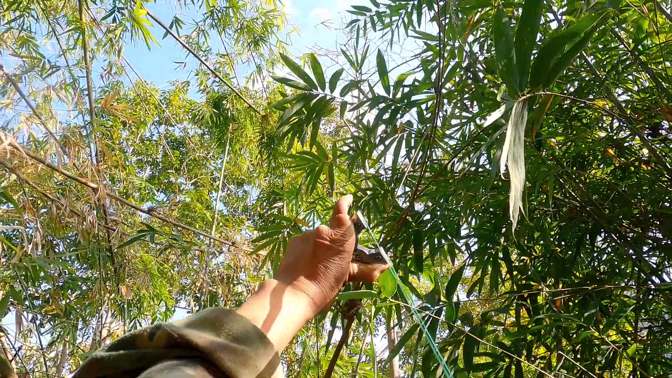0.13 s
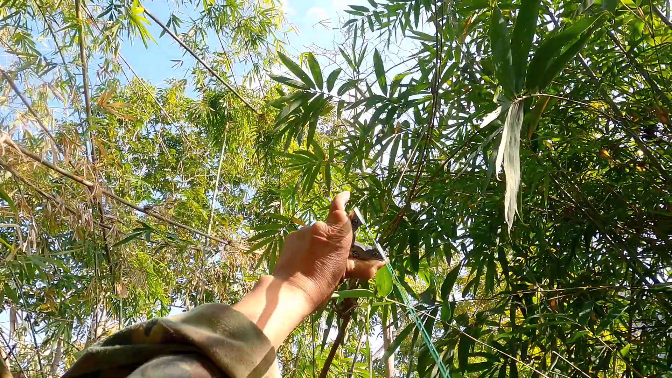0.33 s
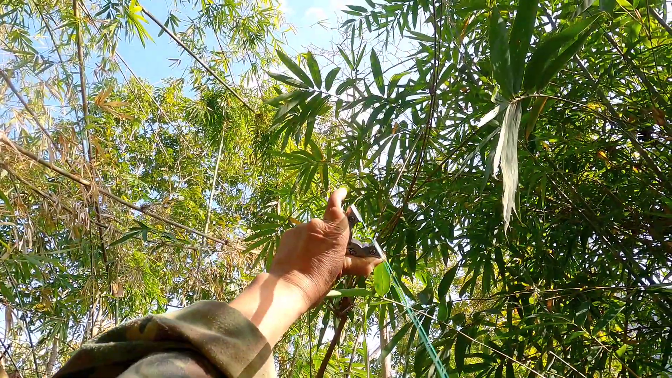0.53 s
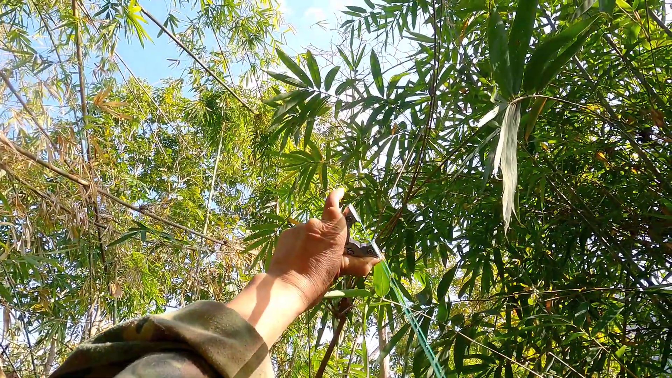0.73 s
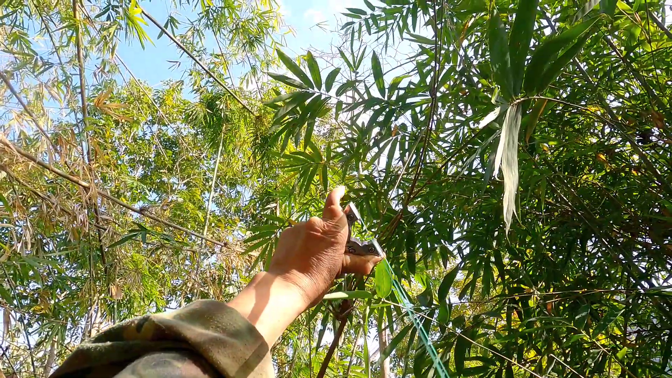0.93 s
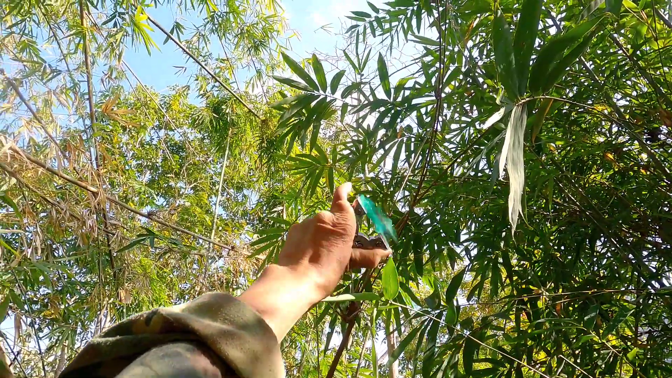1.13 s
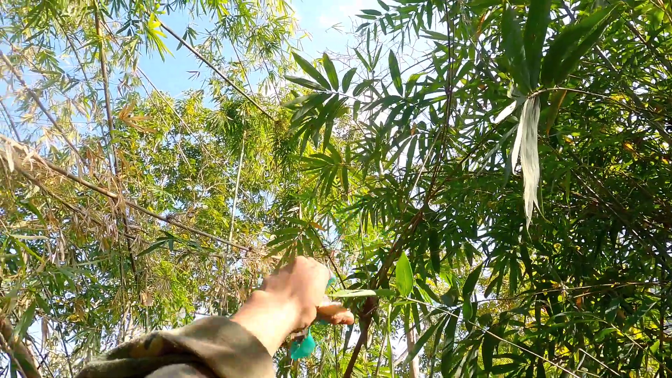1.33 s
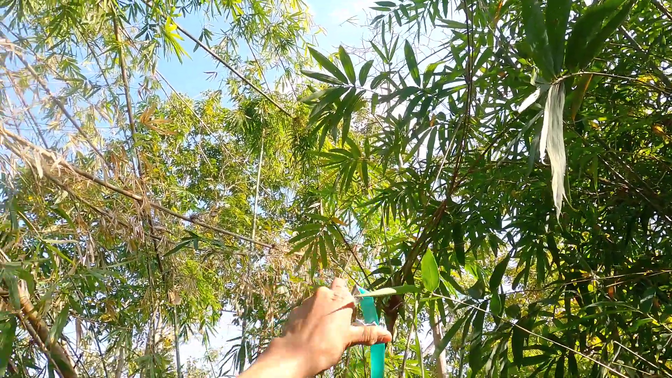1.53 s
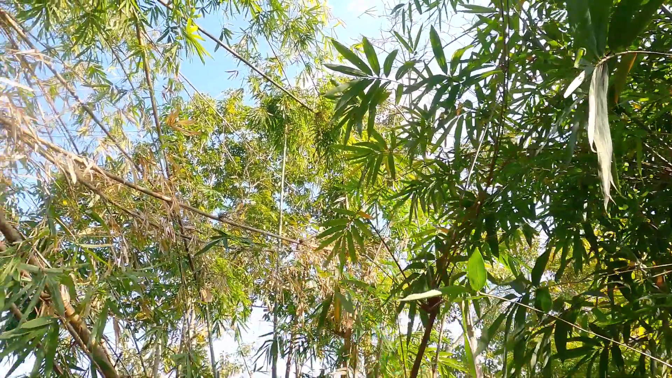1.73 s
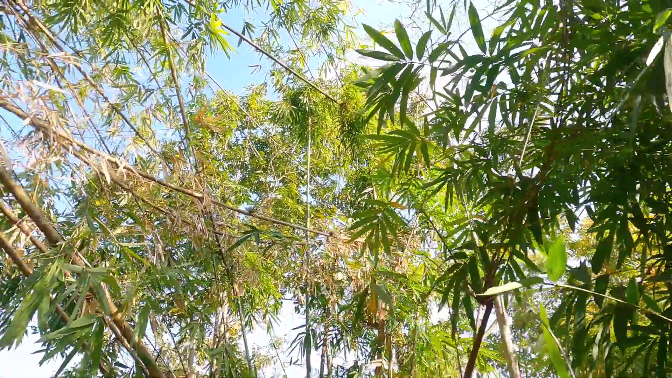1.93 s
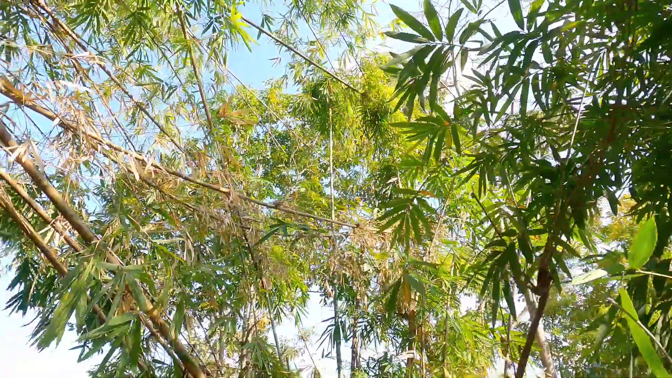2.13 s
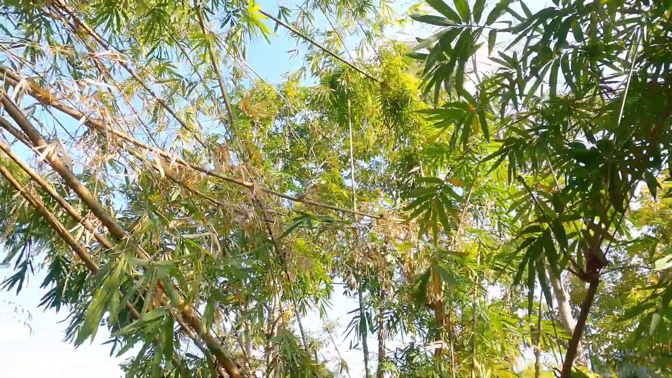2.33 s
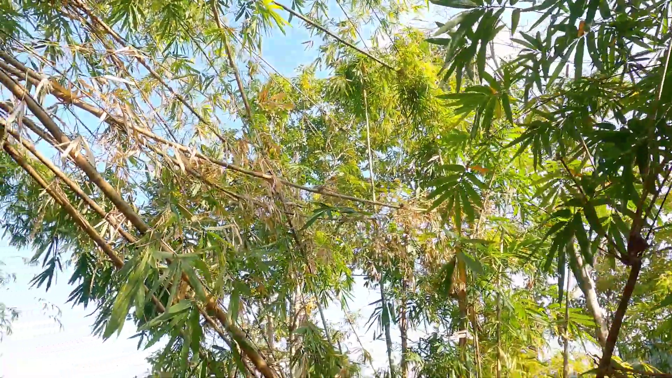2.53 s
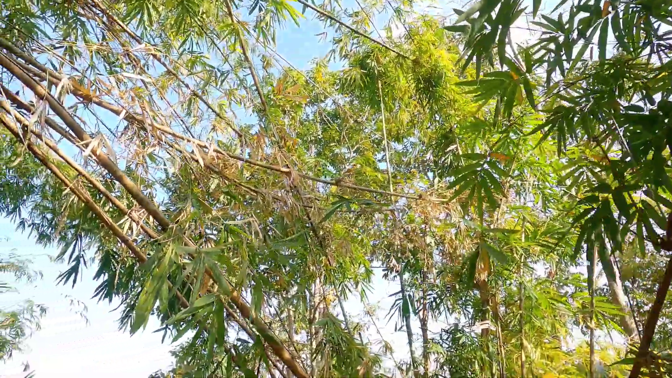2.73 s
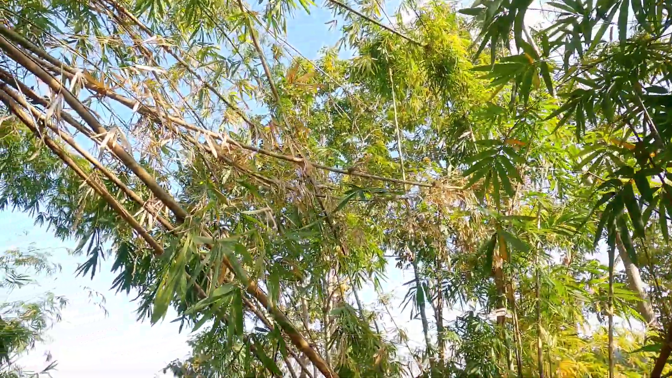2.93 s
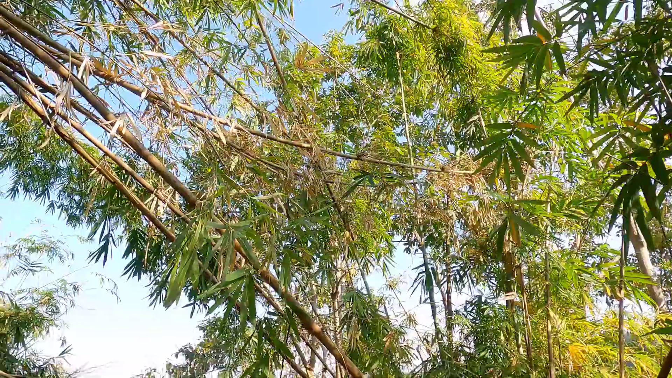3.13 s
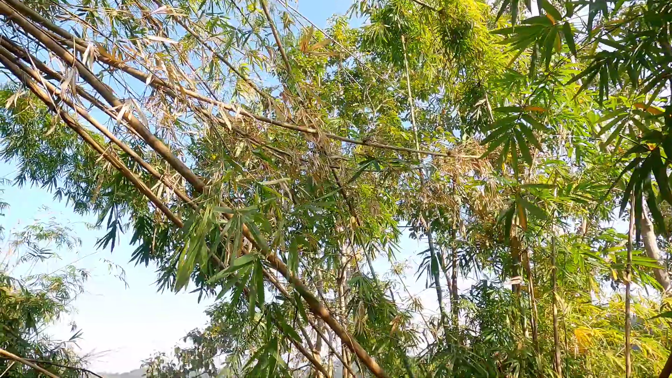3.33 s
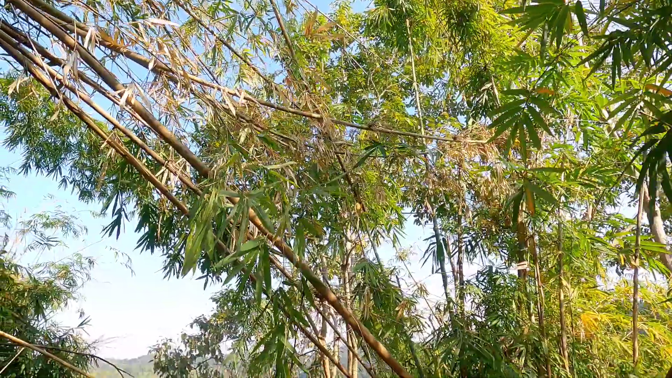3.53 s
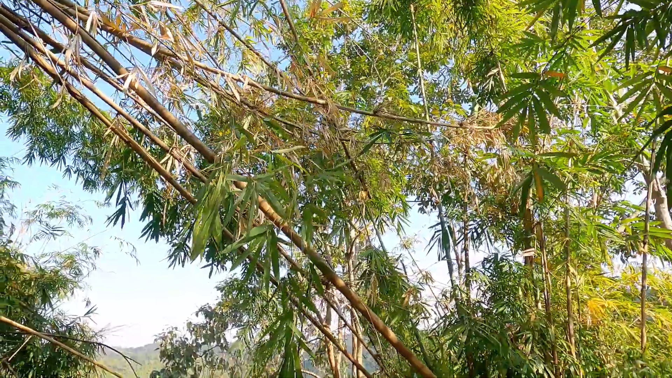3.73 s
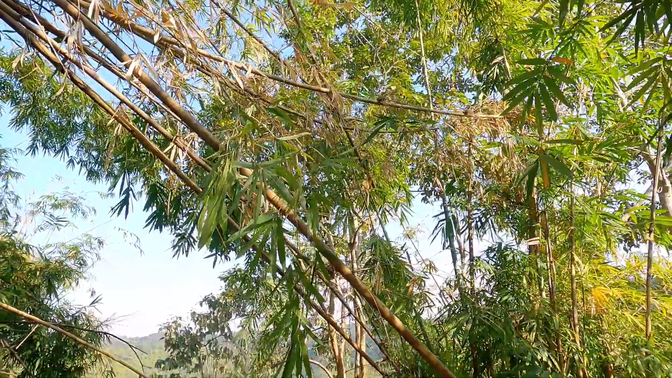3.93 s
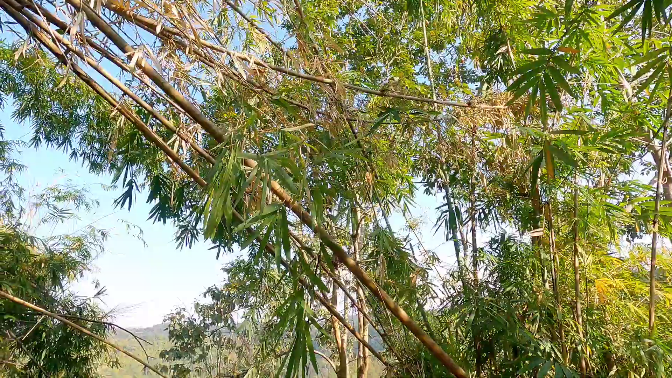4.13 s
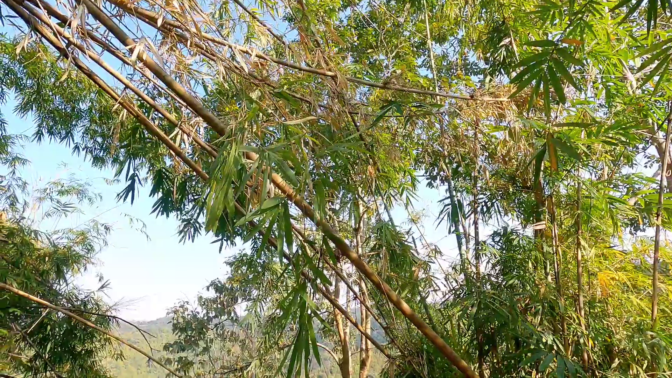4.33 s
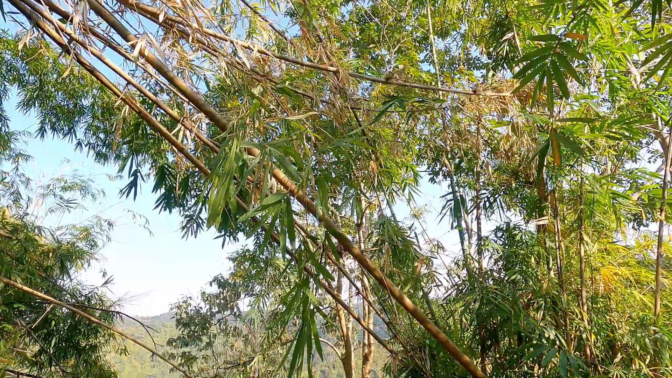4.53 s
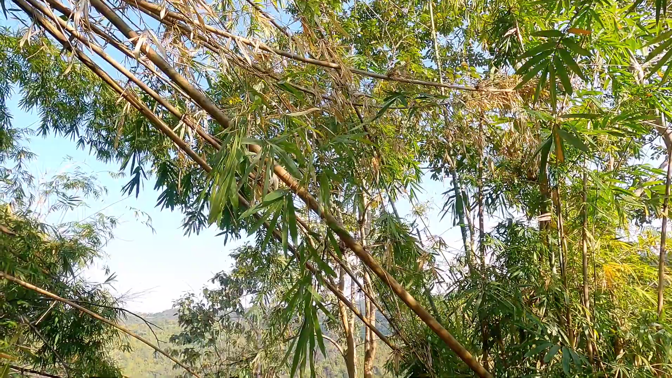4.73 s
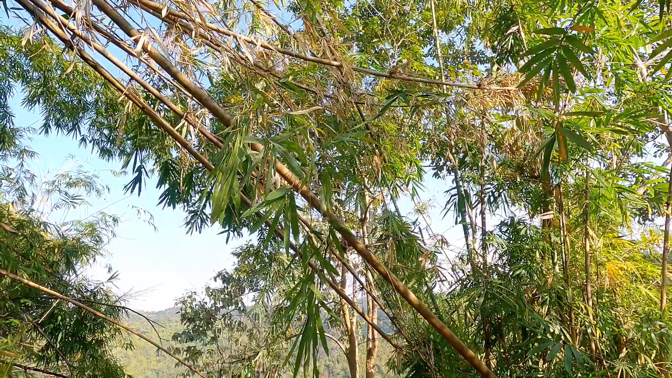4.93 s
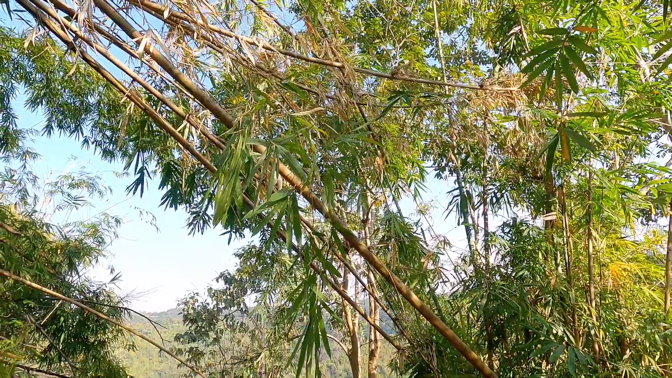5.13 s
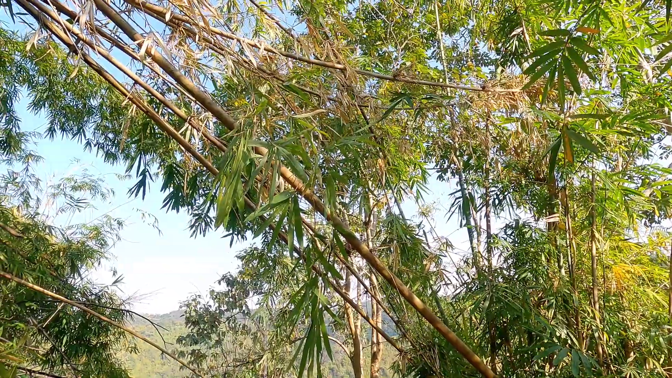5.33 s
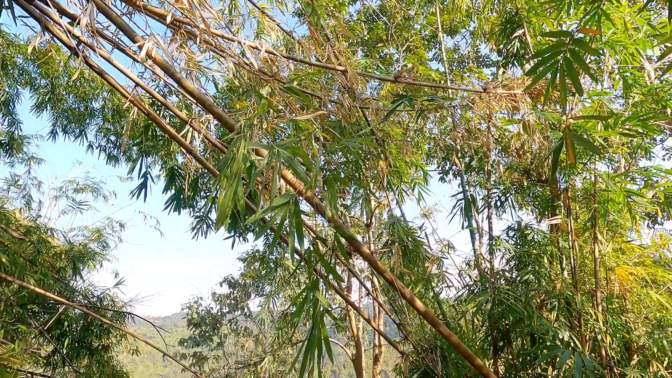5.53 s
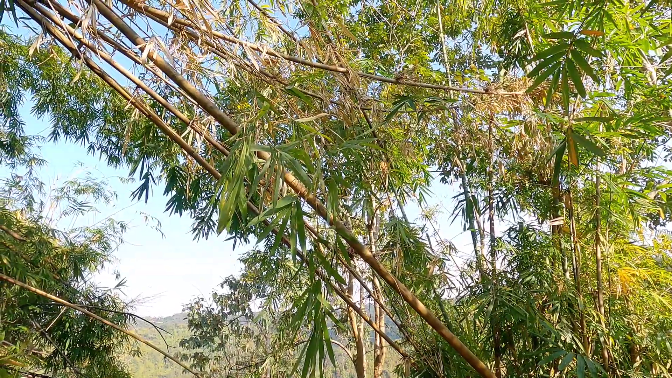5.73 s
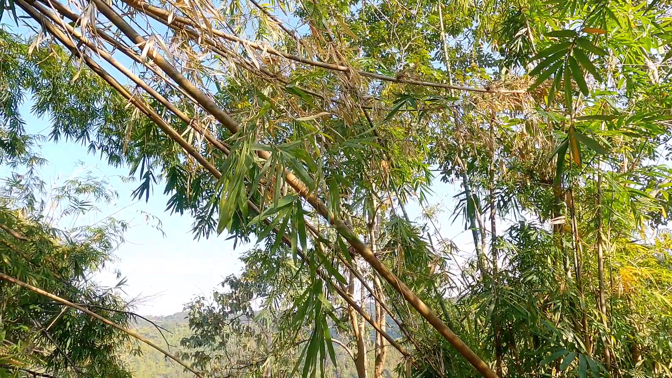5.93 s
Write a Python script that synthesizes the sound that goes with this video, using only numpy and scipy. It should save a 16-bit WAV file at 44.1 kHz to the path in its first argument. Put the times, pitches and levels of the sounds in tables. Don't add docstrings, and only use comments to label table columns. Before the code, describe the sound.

Quiet bamboo grove, faint leaf hiss and low distant hum, a few weak bird notes and a sleeve swish. At just over one second a slingshot releases: whip, very loud snap, fluttering rubber, then a hard pellet crack on a stem. Wind thumps the microphone, leaves shake, and small birds chirp rapidly, thinning toward the end, with sharp twig ticks.

```python
import sys
import numpy as np
from scipy import signal
from scipy.fft import rfft, irfft, next_fast_len
from scipy.io import wavfile
from scipy.ndimage import uniform_filter1d, map_coordinates

SR = 44100
rng = np.random.default_rng(int(sys.argv[2]) if len(sys.argv) > 2 else 0)


def pcm_store(signal):
    levels = np.round(np.clip(np.atleast_2d(signal), -1, 1) * 32767)
    wavfile.write(sys.argv[1], SR, levels.astype(np.int16).T)


def level_to_linear(level):
    exponent = np.asarray(level, float) / 20
    return 10 ** exponent


N = 267951
T_S = np.arange(N) / SR
LET_GO_S, FORK_S, STRIKE_S = 1.166, 1.1888, 1.3814


def unit(x):
    return x / np.sqrt(np.mean(x ** 2) + 1e-20)


def along(points, hz):
    f, v = np.transpose(points)
    return np.interp(np.log(hz + 1), np.log(f + 1), v)


def wobble(rate_hz, count=N):
    knots = rng.standard_normal(int(count * rate_hz / SR) + 4)
    return map_coordinates(knots, [np.arange(count) * rate_hz / SR])


def swells(rows):
    return sum(level_to_linear(db - 20 * np.maximum((s - T_S) / rise_s, (T_S - s) / fall_s))
               for s, db, rise_s, fall_s in rows)


def filtered(x, response):
    m = next_fast_len(N + 8192)
    return irfft(rfft(x, m) * response(np.fft.rfftfreq(m, 1 / SR)), m)[..., :N]


def add(track, s, sound):
    part = track[..., round(s * SR):][..., :sound.shape[-1]]
    part += sound[..., :part.shape[-1]]


def panned(x, pan_db):
    return x * level_to_linear([[pan_db / 2], [-pan_db / 2]])


def rush(spectrum, alike, patchy_db):
    z = signal.stft(rng.standard_normal((2, N + 512)), nperseg=512)[2]
    field = uniform_filter1d(rng.standard_normal(z.shape[1:]), 6, 0)
    field = uniform_filter1d(field, 14, 1)
    pair = signal.istft(z * level_to_linear(patchy_db * unit(field)), nperseg=512)[1][:, :N]

    def response(hz):
        turn = np.arccos(np.clip(along(alike, hz), -1, 1)) / 2
        return level_to_linear(along(spectrum, hz)) * [np.cos(turn), np.sin(turn)]

    mid, side = filtered(pair, response)
    return unit(np.array([mid + side, mid - side]))


# f/Hz, t60/s
ECHO_T60 = [(200, 0.15), (600, 0.37), (3000, 0.42), (7000, 0.49), (12000, 0.24), (15000, .12)]


def grove(x, alike=.6, reach=1):
    hz, t, z = signal.stft(rng.standard_normal((2, SR)), SR, nperseg=128)
    decay = level_to_linear(-60 * t / along(ECHO_T60, hz)[:, None] / reach)
    mid, side = signal.istft(z * decay, SR, nperseg=128)[1]
    tail = np.array([mid + (1 - alike) * side, mid - (1 - alike) * side])
    tail /= np.linalg.norm(tail[0])
    return signal.fftconvolve(np.pad(x, (90, 0))[None], tail, axes=1)[:, :N]


def note(length_s, pitch, db, hoarse):
    u = np.linspace(0, 1, round(length_s * SR))
    path_hz = pitch(u)
    jitter = (.016 + .008 * hoarse * u ** 2) * wobble(190, count=len(u))
    turn = 2 * np.pi * np.cumsum(path_hz * (1 + jitter)) / SR
    steep = path_hz[-1] > 1.3 * path_hz[0]
    tone = np.sin(turn) + .2 * steep * (1 - u) ** 3 * np.sin(2 * turn)
    flutter = unit(level_to_linear((2.2 + hoarse * u ** 2) * wobble(110, count=len(u))))
    shape = np.sin(np.pi * u ** .65) ** 0.42
    return panned(level_to_linear(db + 4.5) * flutter * shape * tone, rng.normal(-1, 1.5))


# t/s, length/s, start f/Hz, end f/Hz, level/dB
CHIRP_CALLS = [(4.58, .058, 3245, 2720, -68), (3.892, .07, 3595, 2744, -67.5),
               (2.502, .014, 1950, 2250, -64), (2.695, 0.013, 2390, 1900, -66),
               (0.7, .047, 2605, 2750, -66), (1.807, 0.034, 1638, 2470, -59),
               (2.045, 0.034, 1920, 2370, -71.5), (2.315, 0.036, 1692, 2295, -70.5),
               (2.339, 0.038, 2180, 2690, -63), (2.457, 0.095, 1634, 2783, -61.5),
               (2.501, 0.044, 2013, 2590, -60), (2.563, 0.06, 2192, 2590, -65),
               (2.635, 0.067, 1997, 2814, -56), (2.643, 0.066, 1778, 2570, -56),
               (2.742, 0.072, 1668, 2799, -59), (2.765, 0.044, 1770, 2610, -59),
               (2.937, 0.055, 1996, 2970, -56.5), (2.987, 0.023, 1550, 2150, -61),
               (3.004, 0.038, 2250, 2620, -57), (2.597, 0.017, 2300, 2600, -63),
               (2.806, .022, 2000, 2500, -63.5), (3.222, 0.017, 2250, 2750, -65),
               (3.486, 0.0496, 3250, 3750, -71), (3.089, 0.031, 2070, 3170, -60.5),
               (3.13, 0.017, 2796, 2970, -74), (3.176, 0.061, 1620, 3005, -60.5),
               (3.232, 0.023, 2785, 2460, -65.5), (3.419, 0.042, 2094, 2683, -60.5),
               (3.767, 0.045, 1988, 3073, -62), (3.799, .024, 2150, 2800, -62),
               (4.076, 0.075, 3154, 3584, -66), (4.764, 0.076, 3397, 3817, -62.5)]
# t/s, length/s, start f/Hz, end f/Hz, level/dB
GLIDE_CALLS = [(0.599, .06, 3000, 3800, -77), (2.111, 0.036, 2750, 5180, -70),
               (4.555, .032, 4500, 3180, -71), (2.452, .014, 2690, 3400, -72.5),
               (2.488, 0.026, 5150, 5650, -74), (2.575, 0.015, 4400, 3700, -73),
               (2.627, .02, 3600, 4710, -71), (3.763, 0.011, 3400, 4286, -70),
               (2.526, 0.028, 1950, 2480, -62), (2.636, 0.014, 3250, 3780, -66),
               (2.916, 0.036, 2310, 5100, -69), (3.045, 0.017, 2560, 3030, -63.5),
               (3.035, .015, 1810, 2200, -66), (3.164, 0.024, 2510, 4190, -69),
               (3.43, 0.013, 2690, 3450, -66.5), (3.453, 0.01, 2803, 3700, -68),
               (3.457, .02, 2140, 2590, -65.5), (3.475, 0.01396, 2530, 3580, -65),
               (3.687, 0.02, 2190, 3330, -66.5), (3.713, 0.018, 2192, 3335, -74),
               (3.952, .015, 2270, 2900, -70), (5.475, 0.28, 3623, 2920, -68),
               (5.568, 0.075, 3700, 4340, -75.5)]
# t/s, length/s, f/Hz, level/dB
PIPE_CALLS = [
    (0.341, 0.043, 2577, -71),
    (0.763, .025, 4270, -76),
    (3.496, 0.033, 3880, -70),
    (3.54, .16, 3910, -78.5),
    (3.723, 0.07, 6048, -72.5),
    (4.149, .1, 3570, -77.5),
    (4.831, 0.057, 3890, -72),
    (4.362, 0.038, 6030, -68),
    (4.73, 0.035, 3750, -71),
    (5.883, 0.0455, 1801, -66),
]
# t/s, length/s, start f/Hz, end f/Hz, level/dB
BUZZ_CALLS = [(0.0, 0.052, 3070, 3050, -71), (0.0, .05, 4000, 4200, -75), (.49, 0.066, 4600, 4900, -77),
              (4.401, 0.048, 6420, 6300, -77.5), (4.793, 0.075, 4800, 4700, -77.5),
              (4.14, 0.14, 3870, 3820, -75), (3.559, 0.15, 3950, 3945, -78),
              (0.085, 0.055, 4700, 4906, -79), (0.218, 0.07, 5273, 5000, -76.5),
              (0.707, 0.067, 5080, 4950, -75.5), (0.917, .062, 4820, 5000, -78),
              (1.604, 0.0384, 4500, 4770, -58.5), (1.773, 0.048, 4500, 4210, -60),
              (3.341, .024, 6900, 7800, -71), (3.74, 0.096, 5740, 4660, -69.5),
              (3.879, 0.063, 4664, 4000, -69.5), (4.069, .11, 5810, 5340, -68),
              (4.543, 0.1, 4920, 3940, -72.5), (5.241, 0.065, 4875, 4850, -74.5),
              (5.69, 0.045, 4850, 4900, -75.5), (4.565, .07, 4000, 3100, -73),
              (3.895, .07, 3900, 3100, -76), (2.72, .03, 2550, 2500, -70), (2.835, .05, 2600, 2500, -72)]
# delay/s, level/dB
TRUNK_ECHOES = [
    (.011, -15.5),
    (.022, -13.5),
]
CLIMB_S = 0.018
SPREAD_HZ, WIDENS_HZ_PER_DB = 220, 23.5


def birds():
    out = np.zeros((2, N))
    for s, length_s, start_hz, end_hz, db in CHIRP_CALLS:
        def climb(u):
            done = np.expm1(-u * length_s / CLIMB_S) / np.expm1(-length_s / CLIMB_S)
            return start_hz + (end_hz - start_hz) * done
        add(out, s, note(length_s, climb, db, hoarse=4.5))
    pipes = [(s, length_s, hz, hz, db) for s, length_s, hz, db in PIPE_CALLS]
    for s, length_s, start_hz, end_hz, db in GLIDE_CALLS + pipes:
        def glide(u):
            return start_hz + (end_hz - start_hz) * u / (u + .6 * (1 - u))
        add(out, s, note(length_s, glide, db, hoarse=3.5))
    for s, length_s, start_hz, end_hz, db in BUZZ_CALLS:
        u = np.linspace(0, 1, round(length_s * SR))
        spread_hz = SPREAD_HZ + WIDENS_HZ_PER_DB * (db + 79.0)
        hz = start_hz + (end_hz - start_hz) * u + spread_hz * wobble(1500, count=len(u))
        shape = (1 - np.exp(-u / 0.2)) * (1 - u) ** 0.85 * level_to_linear(3.4 * wobble(200, count=len(u)))
        buzz = shape * np.sin(2 * np.pi * np.cumsum(hz) / SR)
        add(out, s, panned(level_to_linear(db + 8.5) * buzz, rng.normal(-1, 2.2)))
    out += sum(level_to_linear(db) * np.roll(out[::-1], round(delay_s * SR), axis=1) for delay_s, db in TRUNK_ECHOES)
    near = level_to_linear(-8) * grove(out[0], alike=.5, reach=.14)
    return level_to_linear(-1.0) * out + near + level_to_linear(-10.5) * grove(out[1], alike=.5)


# f/Hz, level/dB per Hz
DRONE_SPECTRUM = [(47, -43.5), (80, -16), (118, -23.5), (133, -9), (157, 3.5), (248, 0.5), (600, -4.5),
                  (780, -32), (1320, -120)]
HUM_SPECTRUM = [(210, -33), (350, -7), (661, -5), (849, -5), (1250, -0.5), (2250, -10.5), (2500, -16.5),
                (2750, -19.5), (3500, -25), (4550, -53.5), (7700, -120)]
HISS_SPECTRUM = [(1470, -32.5), (2500, -5), (3350, -8), (5130, -6.5), (6980, -8), (8230, -18), (11900, -23),
                 (13400, -32.5), (14200, -62), (15500, -120)]
EXHAUST_SPECTRUM = [(50, -48.5), (85, -17.5), (102, -21.5), (150, 2.5), (194, -5), (260, -7), (340, -37),
                    (570, -120)]
# f/Hz, level/dB per Hz
TIP_SPECTRUM = [(2500, -30), (5000, -4), (8500, 0), (11500, -4), (13500, -14), (15000, -34), (16000, -80)]
# f/Hz, level/dB per Hz
PORT_SPECTRUM = [(8, -6), (22, 2), (45, -8), (60, -19), (75, -38), (130, -58), (400, -120)]
# f/Hz, likeness/1
LIKENESS = [(60, 0.53), (180, 0.82), (550, 0.77), (1650, 0.84), (4970, 0.81), (15000, 0.31)]
# f/Hz, level/dB
STEREO_LEAN = [(60, -2), (240, -3), (950, -0.5), (3770, 0), (15000, 3.5)]
# t/s, level/dB
BREEZE_HISS = [
    (0, -76),
    (1.06, -79.5),
    (1.81, -77.5),
    (2.25, -74),
    (3.09, -73.5),
    (3.55, -77.5),
    (4.06, -75),
    (4.82, -78.5),
    (5.43, -75.5),
    (6.08, -79),
]
# peak t/s, level/dB, rise/s, fall/s
LEAF_SHAKE = [
    (1.33, -56.5, 0.17, 0.31),
]
MOTOR_REVS = [
    (0.0, -72, .2, 0.14),
    (.8, -75.5, 1.5, 1.23),
    (2.35, -64.5, .2, 0.87),
    (2.76, -69, .8, 0.93),
    (5.65, -68, 0.48, .4),
]
BAND_FLAP = [
    (1.255, -49.5, .06, 0.083),
]
TIP_RATTLE = [
    (1.2, -43.5, .02, 0.078),
    (1.3, -58.5, .06, .12),
    (1.4, -60, .015, 0.099),
]
PORT_PUFFS = [(0.0, -65.5, .1, 0.104), (.364, -67, 0.37, 0.077), (.642, -70, .055, 0.38),
              (.95, -66, 0.21, 0.22), (1.27, -39, .07, 0.21), (1.71, -50, 0.12, 0.28),
              (1.91, -62, .09, 0.11), (2.05, -61, 0.36, 0.26), (2.14, -55, 0.079, 0.2),
              (2.31, -64.5, 0.28, 0.089), (2.67, -66.5, 1.1, 0.054), (2.77, -70, 0.11, 0.44),
              (3.48, -70.5, 0.217, 0.11), (4.19, -69, .06, 0.1), (5.3, -82, .8, .5)]
DRONE_DB, HUM_DB, HUM_NEARS_DB_PER_S, IDLE_DB = -67.5, -64, 0.36, -81
DRONE_FOLLOWS = .3


def air():
    hiss_db = np.interp(T_S, *np.transpose(BREEZE_HISS))
    shaken = swells(LEAF_SHAKE) * level_to_linear(3.1 * wobble(90))
    drone_gain = level_to_linear(DRONE_DB + DRONE_FOLLOWS * (hiss_db + 77.5) + wobble(2.954)) + .6 * shaken
    far = drone_gain * rush(DRONE_SPECTRUM, LIKENESS, patchy_db=1.5)
    motor_gain = (swells(MOTOR_REVS + BAND_FLAP) + level_to_linear(IDLE_DB)) * level_to_linear(1.5 * wobble(8.4) - 2.5)
    far += motor_gain * rush(EXHAUST_SPECTRUM, LIKENESS, patchy_db=1.5)
    hum_gain = level_to_linear(HUM_DB + HUM_NEARS_DB_PER_S * T_S + 0.37 * wobble(1.5))
    far += hum_gain * rush(HUM_SPECTRUM, LIKENESS, patchy_db=1.6)
    hiss_gain = level_to_linear(hiss_db + 3.5 + 0.725 * wobble(2.5)) + shaken
    far += hiss_gain * rush(HISS_SPECTRUM, LIKENESS, patchy_db=1.0)
    rattle_gain = swells(TIP_RATTLE) * level_to_linear(2 * wobble(150))
    far += rattle_gain * rush(TIP_SPECTRUM, [(1000, .6)], patchy_db=3.5)
    far = filtered(far, lambda hz: level_to_linear(along(STEREO_LEAN, hz) / 2 * [[1], [-1]]))

    lumps = level_to_linear(2.8 * np.array([wobble(18), wobble(10)])) * level_to_linear([[2], [-2]])
    slow_air = unit(lumps * rush(PORT_SPECTRUM, [(30, 0.32)], patchy_db=2.0))
    return far + (level_to_linear(1.0) * swells(PORT_PUFFS) + level_to_linear(-83)) * slow_air


# peak t/s, level/dB, rise/s, fall/s, nylon share/1
ARM_STROKES = [(.297, -61.5, .008, 0.063, 0.98), (.5, -88, 0.36, 0.81, 0.97), (.595, -71, .012, 0.059, 0.9),
               (2.087, -66.5, 0.019, 0.14, 0.08), (2.336, -77.5, 0.0095, 0.26, 0.1),
               (2.62, -78.5, 0.57, 0.26, .05), (2.664, -71, 0.031, 0.044, 0.84),
               (3.06, -72.5, 0.047, 0.24, 0), (3.04, -81, 0.232, 0.88, 0.1), (4.112, -93.5, 0.16, 0.13, 0),
               (5.39, -72, .04, 0.07, 0.01)]
# f/Hz, level/dB per Hz
CLOTH_SPECTRUM = [(400, -22), (1200, -3), (3000, -0.5), (5500, -0.5), (8000, -11.5), (11000, -16.5),
                  (13500, -39), (16000, -55)]
# f/Hz, level/dB per Hz
NYLON_SPECTRUM = [(2000, -39.5), (4500, -5), (8000, 0), (12000, -0.5), (15000, -14), (16500, -39)]


def sleeve():
    grain = unit(level_to_linear(2.5 * wobble(300) + 1.7 * wobble(40)))
    rub_gain = sum((1 - share) * swells([stroke]) for *stroke, share in ARM_STROKES)
    slide_gain = sum(share * swells([stroke]) for *stroke, share in ARM_STROKES)
    rub = level_to_linear(10.0) * rub_gain * rush(CLOTH_SPECTRUM, [(1000, 0.73)], patchy_db=1.0)
    slide = level_to_linear(2.5) * slide_gain * rush(NYLON_SPECTRUM, [(1000, 0.7)], patchy_db=3.5)
    return grain * (rub + slide)


# t/s, level/dB, f/Hz, pan/dB
TWIG_TICKS = [(1.311, -45, 8180, 2), (1.331, -48, 7500, -3), (1.345, -42, 6000, 0), (1.362, -44, 6500, -7),
              (1.16, -61.5, 9500, 0), (1.563, -54, 5800, -3), (1.606, -58, 7200, -2.5),
              (1.613, -58, 7930, 0), (2.039, -66, 3990, -4), (2.0857, -53, 6040, 6), (2.26, -56, 7300, 0),
              (2.3368, -44.5, 3940, -4), (3.056, -53, 6010, 0), (5.2674, -37.5, 2246, 0),
              (5.279, -50.5, 2520, 3), (5.3696, -58, 1494, 3), (5.378, -44, 2810, 12),
              (5.3853, -37, 2039, 10.5), (5.388, -45, 3475, -11)]


def twigs():
    out, t = np.zeros((2, N)), np.arange(SR // 100) / SR
    shape = np.exp(-t / 0.00041) * (1 - np.exp(-t / 0.000087))
    for s, db, hz, pan_db in TWIG_TICKS:
        tick = (np.sin(2 * np.pi * hz * t) + 0.795 * rng.standard_normal(len(t))) * shape
        band = signal.butter(5, [hz / 3, 1.3 * hz + 3500], "band", fs=SR, output="sos")
        add(out, s, panned(level_to_linear(db + 2.5) * signal.sosfilt(band, tick), pan_db))
    near = level_to_linear(-2.5) * grove(out[0], alike=0.67, reach=0.072)
    return out + near + level_to_linear(-25) * grove(out[0], alike=0.37)


# hiss level/dB, flutter level/dB, f/Hz, end f/Hz, edge f/Hz, end edge f/Hz
BAND_RUSH = (-31.5, -12.5, 97, 262.5, 1199, 9000)


def whip():
    hiss_db, flutter_db, hz, end_hz, edge_hz, end_edge_hz = BAND_RUSH
    u = np.linspace(0, 1, round((FORK_S - LET_GO_S) * SR))
    turn = 2 * np.pi * np.cumsum(hz + (end_hz - hz) * u ** 4) / SR
    flutter = np.cos(turn) * np.sin(np.pi * u) ** 0.4

    def hiss(top_hz):
        band = signal.butter(4, [500, top_hz], "band", fs=SR, output="sos")
        return unit(signal.sosfilt(band, rng.standard_normal(len(u))))

    opening = hiss(edge_hz * 3) + u ** 5 * hiss(end_edge_hz)
    rise_db = -30 * (1 - u)
    out = np.zeros(N)
    add(out, LET_GO_S, level_to_linear(flutter_db + rise_db) * flutter + level_to_linear(hiss_db + rise_db) * opening)
    return panned(out, -1)


# t/s,
# length/s, level/dB, f/Hz
FOLD_SLAPS = [(1.1836, .001, -29, 2000), (1.1853, .0016, -30.5, 3800), (1.189, .001, -18, 4500),
              (1.1902, .0012, -15.5, 9900), (1.1905, .0008, -18, 5000), (1.1914, .0005, -16.5, 5500),
              (1.1923, .0016, -21, 6000), (1.194, .0008, -17, 3280), (1.1946, .0016, -19, 7500),
              (1.1958, .0008, -13.5, 4140), (1.1959, .0012, -15.5, 10500), (1.1969, .0011, -18.5, 7860),
              (1.198, .018, -41, 5000), (1.199, .0012, -26.5, 6000), (1.2, .002, -30, 8000),
              (1.2027, .0008, -30, 5500), (1.2044, .0007, -33.5, 2013), (1.2135, .001, -29, 3300),
              (1.216, .0022, -23, 5200), (1.208, .01, -35.5, 4500), (1.242, .009, -39, 5000),
              (1.2174, .0008, -24.5, 8000), (1.2185, .0008, -23, 3294), (1.2196, .0011, -21, 7040),
              (1.2206, .002, -28, 5993), (1.2227, .001, -20.5, 5004), (1.2232, .001, -27.5, 12000),
              (1.2247, .0009, -25, 4992), (1.2264, .0008, -30, 4799), (1.2285, .001, -30.5, 2800),
              (1.229, .007, -39, 5010), (1.2353, .004, -32, 6990), (1.2383, .002, -26.5, 5990),
              (1.2404, .0013, -24, 6000), (1.2409, .002, -28, 11070), (1.242, .037, -46.5, 6040),
              (1.2484, .001, -37, 4970), (1.2523, .0008, -37.5, 4500), (1.272, .1, -59, 8850)]
# f/Hz, level/dB per Hz
RUBBER_SPECTRUM = [(220, -35.5), (380, -16.5), (637, -4), (1190, -1), (1330, -6.5), (2490, -7.5),
                   (2820, -13.5), (5350, -7), (6660, -10.5), (10700, -10.5), (16000, -38.5)]
# t/s, level/dB, slack/s
AIR_PUSHES = [
    (1.1891, -2, .00125),
    (1.1966, -20, .0015),
    (1.204, -34, .003),
    (1.2125, -30, .002),
    (1.218, -14, .006),
    (1.2275, -25, .003),
]
# t/s, level/dB, f/Hz, decay/s
HAND_RECOIL = (1.194, -15, 52, .022)
FOLD_Q, FOLD_DB = 3, 10


def bands():
    spiky = rng.standard_normal((2, N)) * level_to_linear(2.5 * np.clip(wobble(3000), -3, 1.7))
    grain = filtered(spiky[0] + .2 * spiky[1] * [[1], [-1]], lambda hz: level_to_linear(along(RUBBER_SPECTRUM, hz)))
    crackle, push, t = np.zeros((2, N)), np.zeros((2, N)), np.arange(SR // 10) / SR
    grid_hz = np.linspace(0, SR / 2, 48)
    for s, length_s, db, hz in FOLD_SLAPS:
        n = round(length_s * SR)
        burst = np.sin(np.pi * np.arange(n) / n) ** 0.7 * grain[:, round(s * SR):][:, :n]
        dulling = 1 / (1 + (grid_hz / hz / 2.5) ** 4)
        ring = level_to_linear(FOLD_DB) / (1 + (2 * FOLD_Q * (grid_hz / hz - 1)) ** 2)
        fold = signal.firwin2(65, grid_hz, dulling + ring, fs=SR)
        slap = signal.fftconvolve(burst, fold[None], axes=1)
        slap *= level_to_linear(db) * np.sqrt(2 * n) / np.linalg.norm(slap)
        add(crackle, s - 32 / SR, slap)
    for s, db, slack_s in AIR_PUSHES:
        swing = -np.sin(5.8 * np.log(1 + t / (slack_s * np.array([[.96], [1.04]]))))
        shape = (1 - np.exp(-t / 0.00068)) * np.exp(-t / 0.011) / (1 + (t / (0.0037 + slack_s)) ** 4)
        add(push, s, level_to_linear(db) * swing * shape)
    s, db, hz, decay_s = HAND_RECOIL
    add(push, s, level_to_linear(db) * np.sin(2 * np.pi * hz * t) * np.exp(-t / decay_s))
    echo = level_to_linear(-22.0) * grove(crackle[0] + 0.52 * push[0], alike=0.42)
    return crackle + panned(push, -2) + echo


# f/Hz, width/Hz, level/dB
STEM_MODES = [(210, 190, -13), (407, 390, -7.5), (1050, 380, 4.5), (4500, 2900, -2), (6940, 2000, -0.5),
              (11100, 3000, -20)]
PELLET_LEVELS = (3.5, 1.5, -7.5, -13)


def pellet():
    blow_db, pan_db, near_db, far_db = PELLET_LEVELS
    blow = np.zeros(N)
    add(blow, STRIKE_S, level_to_linear(blow_db) * np.array([-0.33, -1.19, -0.37, 0.72, -0.3]))

    def wood(f):
        modes = sum((-1) ** k * level_to_linear(db) * 1j * f * width_hz / (hz * hz - f * f + 1j * f * width_hz)
                    for k, (hz, width_hz, db) in enumerate(STEM_MODES))
        return modes / (1 + 1j * f / 11000) ** 3

    crack = filtered(blow, wood)
    near = level_to_linear(near_db) * grove(crack, alike=0.34, reach=0.29)
    return panned(crack, pan_db) + near + level_to_linear(far_db) * grove(crack, alike=0.63)


def scene():
    return birds() + air() + sleeve() + twigs() + whip() + bands() + pellet()


def roll_off(x):
    return signal.sosfilt(signal.butter(12, 16290, fs=SR, output="sos"), x)


DUCK_DB, WAIT_S, DUCK_S, HOLD_S, RECOVER_S = -4, .03, .1, 0.46, 0.35
TOP_HZ, CEILING = 15600, .98


def record(dry):
    turns_s = np.cumsum([WAIT_S, DUCK_S, HOLD_S, RECOVER_S])
    ducked = dry * level_to_linear(DUCK_DB * np.interp(T_S - FORK_S, turns_s, [0, 1, 1, 0]))
    held = ducked / (1 + np.abs(ducked / CEILING) ** 6) ** (1 / 6)
    held = filtered(held, lambda hz: 1 / np.sqrt(1 + (hz / TOP_HZ) ** 60))
    return roll_off(held)


dry = scene()
out = record(dry)
pcm_store(out)
```